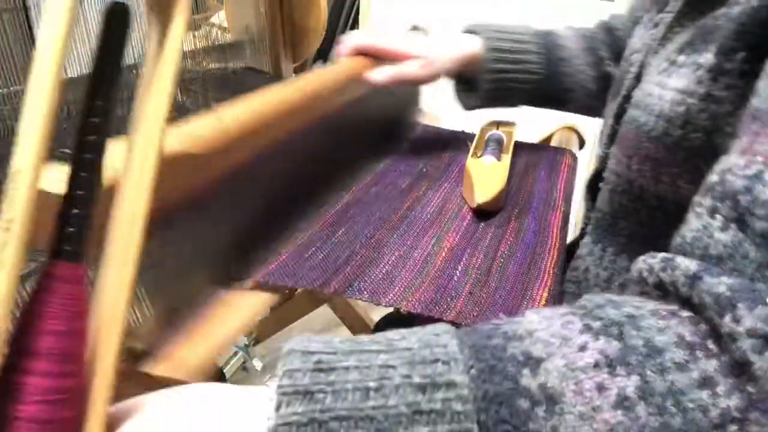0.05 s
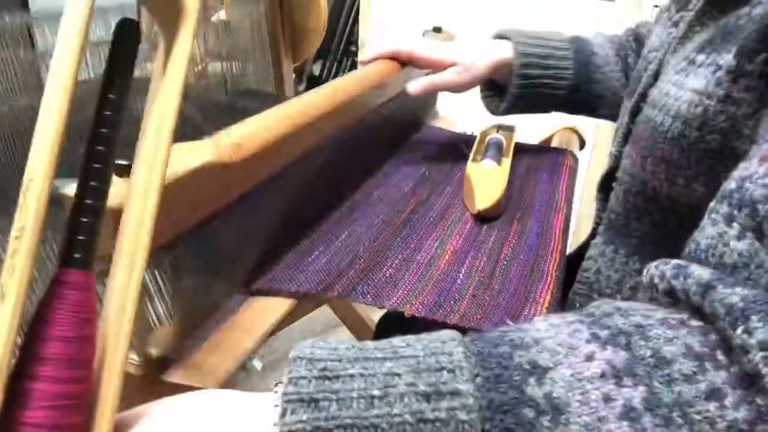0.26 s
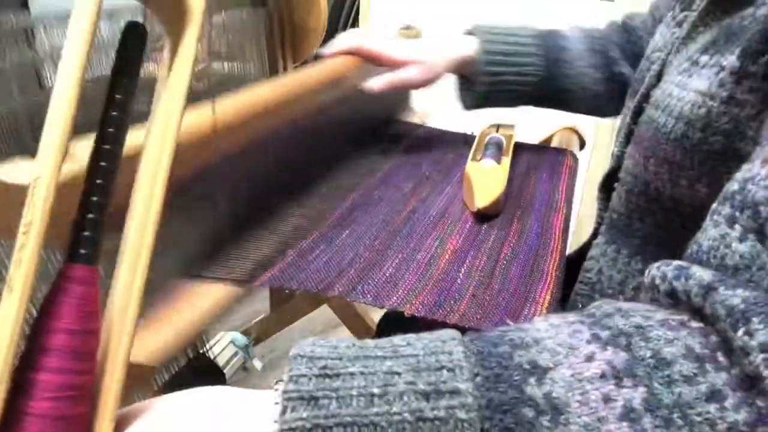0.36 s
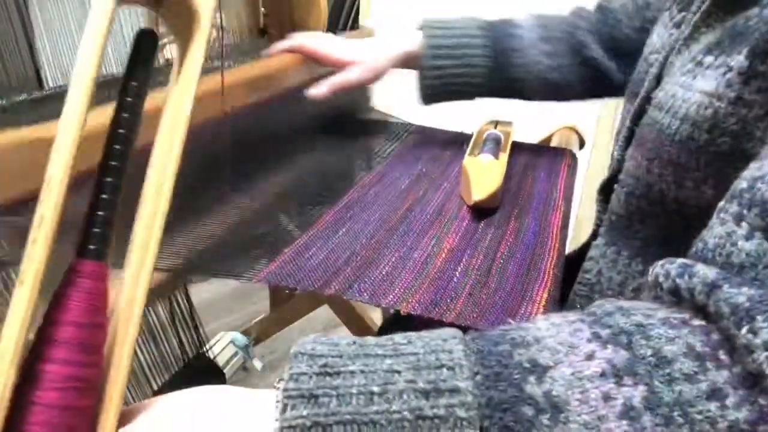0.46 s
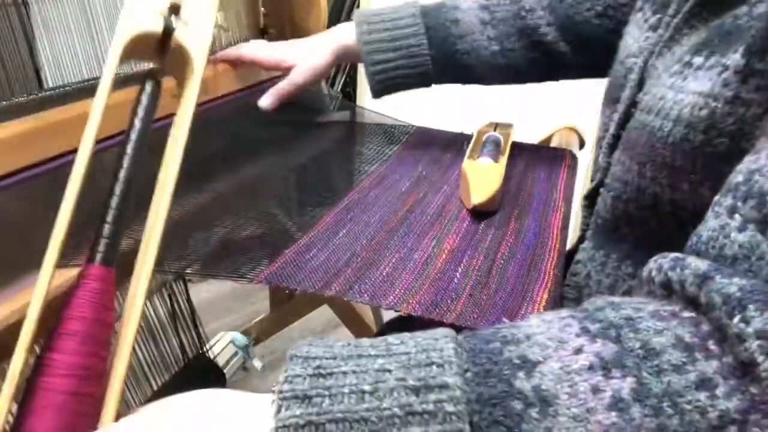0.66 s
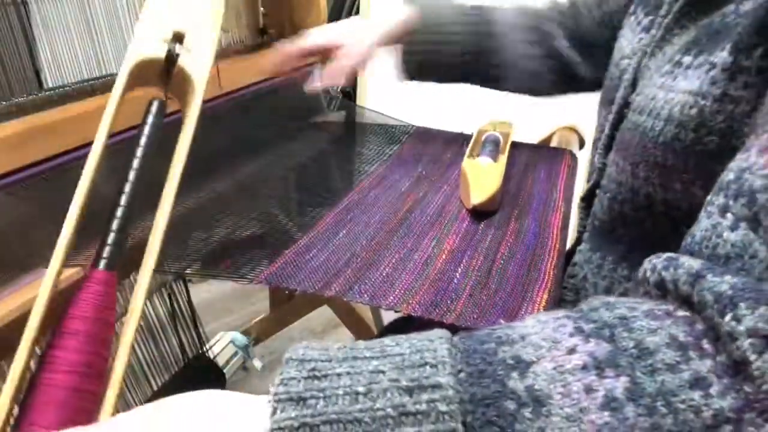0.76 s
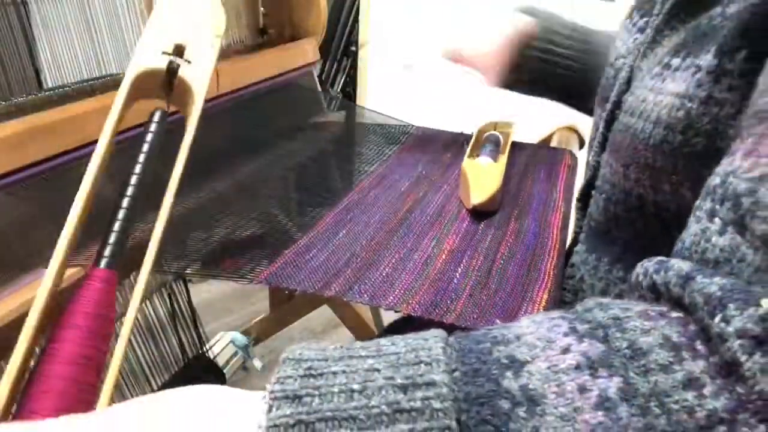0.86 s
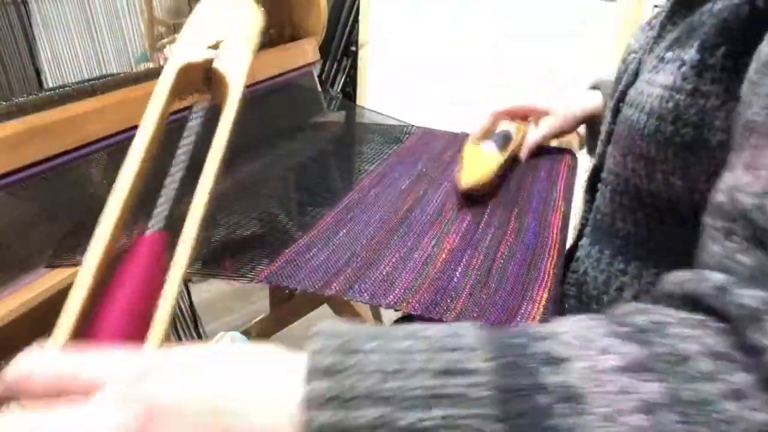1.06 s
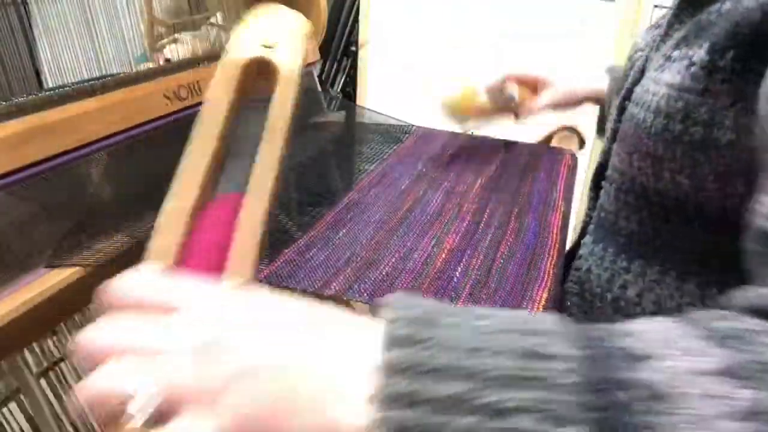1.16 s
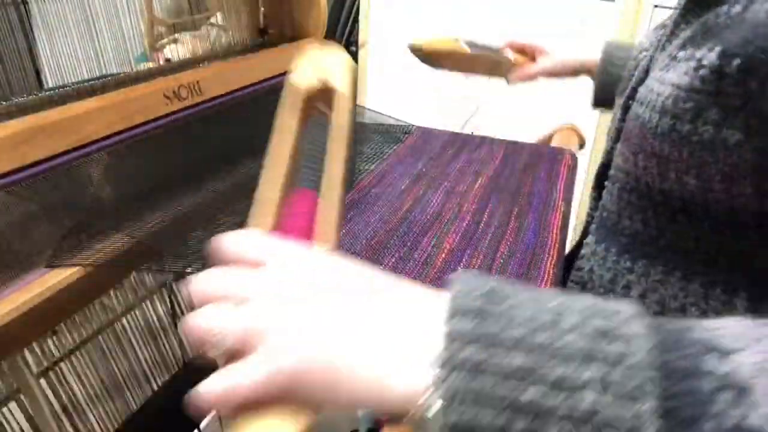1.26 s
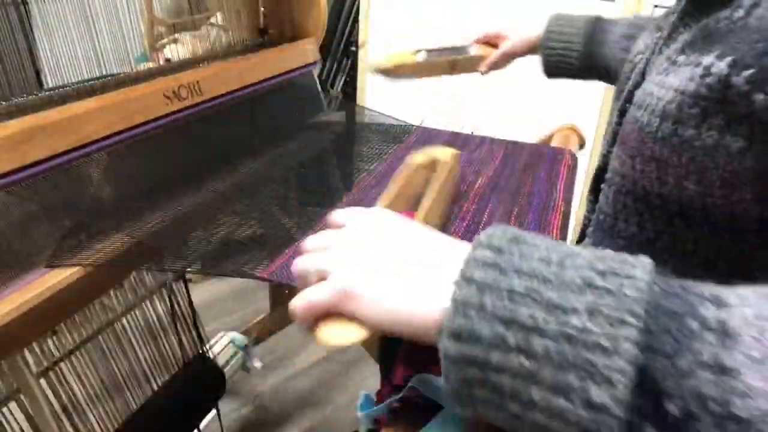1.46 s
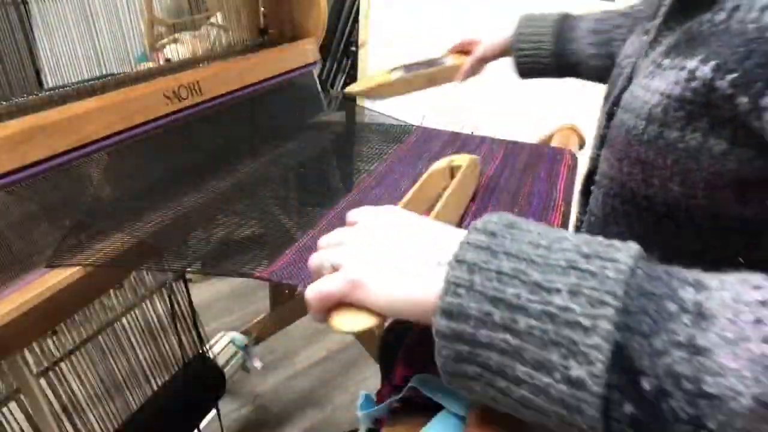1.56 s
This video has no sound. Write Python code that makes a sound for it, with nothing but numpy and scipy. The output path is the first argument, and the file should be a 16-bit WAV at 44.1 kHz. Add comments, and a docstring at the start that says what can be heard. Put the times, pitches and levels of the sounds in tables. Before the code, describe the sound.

Close up in a quiet room, a wooden hand loom works through one stroke: threads hiss, the beater lands with a cushioned thud and returns with a harder, rattling knock. Light shuttle clicks and a tiny squeak follow.

```python
"""A wooden hand loom in a small, quiet room. The beater swings forward with a faint squeak, its reed
hissing and scraping along the warp. It thuds into the cloth at 0.4 s, a few snags snap free, and at
0.76 s it knocks back against its stop while wires and frame rattle. Two boat shuttles, already heard
during the swing, are picked up: spindles click, bobbins tap the wood. Light ticks and a squeak end it."""
import sys
import numpy as np
from scipy import signal
from scipy.fft import rfft, irfft
from scipy.io import wavfile

SR = 44100
rng = np.random.default_rng(int(sys.argv[2]) if len(sys.argv) > 2 else 0)


def wrap_up_sound(samples):
    """Save the sound to the file named by the first command line argument, as 16-bit audio."""
    columns = np.atleast_2d(samples).T
    # keep every value between -1 and 1, then stretch to whole-number steps
    tamed = np.clip(columns, -1, 1)
    steps = np.round(tamed * 32767).astype(np.int16)
    wavfile.write(sys.argv[1], SR, steps)


N = 70560
T = np.arange(N) / SR

# blows on cloth, on stop: (time [s], level [dB], brightness [Hz])
CLOTH_BLOWS = [(.4165, -3.5, 7000), (.427, 4, 3220), (.4348, 6, 1340), (.4445, 0, 1490), (.474, -4.5, 2230),
               (.533, -5.5, 3800)]
STOP_BLOWS = [(.760, -5.5, 2520), (.7665, 0, 4030), (.7682, 1.5, 2270), (.7973, -2, 2640),
              (.8045, -10.5, 3220)]
# modes: (frequency [Hz], level [dB], t60 [s])
BEATER_MODES = [(505, -48.5, 0.15), (742, -58, 0.33), (924, -44.5, 0.075), (1283, -44, 0.13),
                (1770, -48, .12)]
FRAME_MODES = [(340.5, -50, 0.42), (738.6, -41.5, 0.12), (886, -41.5, 0.14), (1290, -68, 0.3),
               (1427, -35, 0.049), (1690, -53, 0.064), (2770, -47, 0.18), (3030, -56, 0.61)]
# dense wood resonances: (frequency [Hz], level [dB])
BEATER_WOOD = [(180, -16.5), (420, 3.5), (1300, 3.5), (1900, 7.5), (3500, 2), (4400, 5.5), (5500, -1.5),
               (15000, -14)]
FRAME_WOOD = [(230, -8.5), (640, -13), (1600, 1), (2700, -3), (3100, -9), (3600, -8), (4000, -2.5),
              (4900, -5), (5600, -11), (15000, -20)]
def beater():
    """Cushioned thud into the cloth, then a hard, bouncing knock on the frame's stop."""
    thud = strike(CLOTH_BLOWS, BEATER_MODES, BEATER_WOOD, low_cut_hz=154, attack_s=0.0015,
                  crack_db=-38, crack_t60_s=0.082, ring_db=-44, ring_t60_s=0.24)
    knock = strike(STOP_BLOWS, FRAME_MODES, FRAME_WOOD, low_cut_hz=292, attack_s=0.00024,
                   crack_db=-26.5, crack_t60_s=0.023, ring_db=-48.5, ring_t60_s=0.24)
    return thud + knock


# contacts: (time [s], level [dB], brightness [Hz])
SPINDLE_CLICKS = [(.3832, 4, 4180), (.798, 2, 6660), (.8115, 2, 6000), (1.0055, 5.5, 8650)]
BOBBIN_TAPS = [(.268, -4.5, 3000), (.384, 2, 3170), (.9412, 4, 4330), (1.089, -6.5, 2460),
               (1.138, -6.5, 2740), (1.161, -12.5, 1880)]
TICKS = [(1.193, 4, 2920), (1.3695, -2.5, 6060), (1.376, 4, 6000)]
# modes: (frequency [Hz], level [dB], t60 [s])
SPINDLE_MODES = [(1750, -32.5, 0.0089), (2360, -60, 0.3), (3844, -51, 0.18), (4080, -45, 0.019),
                 (4610, -57, 0.04), (6126, -33.5, 0.021), (6140, -50.5, 0.13), (8480, -55.5, 0.097)]
BOBBIN_MODES = [(1154, -42, 0.073), (1208, -56, 0.67), (2595, -41.5, 0.044), (3120, -50, 0.073)]
TICK_MODES = [(1972, -67.5, 0.22), (2240, -60, 0.066), (3146, -55, 0.044), (3510, -51, 0.022),
              (5330, -61.5, 0.041)]
# dense wood resonances: (frequency [Hz], level [dB])
SHUTTLE_WOOD = [(400, -10), (1500, 3), (2800, -5.5), (7000, -15), (9500, -28), (15000, -22)]
def shuttles():
    """Metal spindles click and bobbins tap in the wooden shuttles; loose parts tick."""
    clicks = strike(SPINDLE_CLICKS, SPINDLE_MODES, SHUTTLE_WOOD, low_cut_hz=510, attack_s=0.00089,
                    crack_db=-45, crack_t60_s=0.028, ring_db=-50.5, ring_t60_s=0.18)
    taps = strike(BOBBIN_TAPS, BOBBIN_MODES, SHUTTLE_WOOD, low_cut_hz=740, attack_s=0.0013,
                  crack_db=-47, crack_t60_s=0.025, ring_db=-58.5, ring_t60_s=0.37)
    ticks = strike(TICKS, TICK_MODES, SHUTTLE_WOOD, low_cut_hz=1470, attack_s=0.0012,
                   crack_db=-58.5, crack_t60_s=0.08, ring_db=-79, ring_t60_s=0.13)
    return clicks + taps + ticks


# snaps: (time [s], level [dB], brightness [Hz])
SNAGS = [(.5243, 4.5, 7000), (.6385, 4.5, 2860), (.6645, -11, 7040)]
# modes: (frequency [Hz], level [dB], t60 [s])
SNAG_MODES = [(2820, -46, 0.025), (4700, -49, 0.06)]
def snags():
    """Snags in the reed snap free."""
    return strike(SNAGS, SNAG_MODES, BEATER_WOOD, low_cut_hz=680, attack_s=0.00031,
                  crack_db=-43.5, crack_t60_s=0.014, ring_db=-65, ring_t60_s=0.066)


# rattle envelope: (time [s], level [dB])
RATTLE_ENVELOPE = [(0, -66), (.16, -67), (.22, -57.5), (.37, -57.5), (.42, -53), (.58, -53.5),
                   (.745, -64.5), (.83, -46.5), (.92, -60), (.99, -56.5), (1.22, -66.5), (1.33, -76.5),
                   (1.6, -70.5)]
# heddle and frame resonances: (frequency [Hz], width [Hz], level [dB])
RATTLE_BANDS = [(334, 150, -3), (463, 360, -3.5), (865, 170, -2.5), (1214, 97, -2), (1995, 870, 1),
                (4060, 1350, -1)]
def rattle():
    """Many small contacts ring the heddle wires and frame."""
    ringing = 0
    for hz, width_hz, db in RATTLE_BANDS:
        b, a = signal.iirpeak(hz, hz / width_hz, fs=SR)
        contacts = grains(per_s=2500, spread_db=4)
        ringing += from_db(db) * rms_one(signal.lfilter(b, a, contacts))
    return level(RATTLE_ENVELOPE) * rms_one(low_pass(ringing, hz=6700))


# hiss envelope: (time [s], level [dB])
BRUSH_ENVELOPE = [(.165, -66.5), (.197, -52), (.213, -62), (.225, -49), (.295, -61.5), (.385, -61.5),
                  (.415, -45), (.5, -62.5), (.535, -55.5), (.67, -63), (.74, -66), (.9, -67), (.96, -79.5),
                  (1.6, -79)]
# hiss spectrum: (frequency [Hz], level [dB])
BRUSH_SPECTRUM = [(1500, -0.5), (6000, 1.5), (7100, 7), (9000, -2), (11700, 1.5), (15500, 0)]
def reed_brush():
    """Warp threads hiss unevenly through the reed; then sleeves rustle faintly."""
    flicker_db = 1.2 * wander(hz=50)
    return level(BRUSH_ENVELOPE) * from_db(flicker_db) * noise(BRUSH_SPECTRUM)


# scrape envelope, forward and back: (time [s], level [dB])
SCRAPE_ENVELOPE = [(.16, -77), (.2, -61.5), (.3, -62.5), (.5, -59.5), (.54, -59), (.6, -61.5),
                   (.675, -56.5), (.73, -72.5), (1.1, -103)]
# blade resonances: (frequency [Hz], width per filter pass [Hz], level [dB])
BLADE_BANDS = [(2380, 600, -2), (4555, 490, 0.5), (6630, 570, -8.5)]
def reed_scrape():
    """Threads catch and slip in spurts; each slip rings all the reed's blades."""
    spurt_db = 2 * wander(hz=69)
    slips = grains(per_s=1500, spread_db=4) * from_db(spurt_db)
    blades = 0
    for hz, width_hz, db in BLADE_BANDS:
        b, a = signal.iirpeak(hz, hz / width_hz, fs=SR)
        ringing = signal.lfilter(b, a, signal.lfilter(b, a, slips))
        blades += from_db(db) * rms_one(ringing)
    return level(SCRAPE_ENVELOPE) * rms_one(blades)


# squeaks: (start [s], length [s], pitch [Hz], level [dB])
SQUEAKS = [(0, 0.19, 1110, -65), (1.384, 0.047, 1997, -60.5)]
def squeaks():
    """Turning parts give thin, wavering tones that swell, sag and fade."""
    sag_hz_per_s, waver_hz = 200, 27
    out = np.zeros(N)
    for start_s, length_s, hz, db in SQUEAKS:
        age_s = T - start_s
        pitch_hz = hz - sag_hz_per_s * age_s + waver_hz * wander(hz=50.5)
        progress = np.clip(age_s / length_s, 0, 1)
        swell = np.sqrt(np.abs(np.sin(np.pi * progress)))
        out += from_db(db) * swell * np.sin(2 * np.pi * np.cumsum(pitch_hz) / SR)
    return out


def reverb(x):
    """Short, dull, diffuse tail from the walls."""
    t60_s, delay_s, wet_db = 0.43, 0.0065, -13
    tail = low_pass(rng.standard_normal(N), hz=6300) * decay(t60_s) * (T > delay_s)
    tail /= np.sqrt(np.sum(tail ** 2))
    return from_db(wet_db) * signal.fftconvolve(x, tail)[:N]


# background spectrum: (frequency [Hz], level [dB])
ROOM_SPECTRUM = [(20, -57), (40, -4.5), (100, 4), (1200, -9.5), (3000, -8.5), (15000, -21)]
def room_tone():
    """Faint, steady, bass-heavy noise."""
    return from_db(-70.5) * noise(ROOM_SPECTRUM)


def strike(blows, modes, wood, low_cut_hz, attack_s, crack_db, crack_t60_s, ring_db, ring_t60_s):
    """Crack, woody ring and modes per blow. Soft contacts are dull; small parts radiate little bass."""
    tones = 0
    for k, (hz, db, t60_s) in enumerate(modes):
        travel_s = 20e-6 * wander(hz=32.8)  # the part trembles, so travel time wanders
        tones += (-1) ** k * from_db(db) * decay(t60_s) * np.sin(2 * np.pi * hz * (T + travel_s))
    envelope = from_db(crack_db) * decay(crack_t60_s) + from_db(ring_db) * decay(ring_t60_s)
    attack = np.minimum(T / attack_s, 1)
    out = np.zeros(N)
    for time_s, db, bright_hz in blows:
        start = int(time_s * SR)
        blow = attack * (tones + envelope * noise(wood))
        out[start:] += from_db(db) * low_pass(blow, bright_hz)[:N - start]
    return signal.sosfilt(signal.butter(2, low_cut_hz, "high", fs=SR, output="sos"), out)


def grains(per_s, spread_db):
    """Random tiny contacts of uneven size."""
    sizes = from_db(spread_db * np.minimum(rng.exponential(1, N), 4))
    signs = rng.choice([-1, 1], N)
    hits = rng.random(N) < per_s / SR
    return sizes * signs * hits + 1e-18


def noise(spectrum):
    """Unit-rms noise shaped by (frequency [Hz], level [dB]) points."""
    hz, db = np.transpose(spectrum)
    bins_hz = np.maximum(np.arange(N // 2 + 1) * SR / N, 1)
    gain = from_db(np.interp(np.log(bins_hz), np.log(hz), db))
    return rms_one(irfft(rfft(rng.standard_normal(N)) * gain, N))


def wander(hz):
    """Unit-rms random drift below hz."""
    return rms_one(low_pass(rng.standard_normal(N + N // 4), hz)[-N:])


def low_pass(x, hz):
    """Second-order treble roll-off."""
    return signal.sosfilt(signal.butter(2, hz, fs=SR, output="sos"), x + 1e-18)


def level(envelope):
    """Gain from (time [s], level [dB]) points."""
    return from_db(np.interp(T, *np.transpose(envelope)))


def decay(t60_s):
    """Exponential fall, 60 dB in t60_s."""
    return np.exp(-np.log(1000) * T / t60_s)


def from_db(db):
    """Decibels to gain."""
    return 10 ** (np.asarray(db) / 20)


def rms_one(x):
    """Scale to unit rms."""
    return x / np.sqrt(np.mean(x ** 2) + 1e-20)


def scene():
    """Loom and shuttles close by in a quiet room, mono."""
    direct = beater() + shuttles() + squeaks() + reed_scrape() + snags()
    return (direct + reverb(direct) + rattle() + reed_brush() + room_tone())[None]


def record(dry):
    """Steep treble cut."""
    cutoff_hz = 15750
    return signal.sosfilt(signal.ellip(12, .1, 70, cutoff_hz, fs=SR, output="sos"), dry)


dry = scene()
out = record(dry)
wrap_up_sound(out)
```